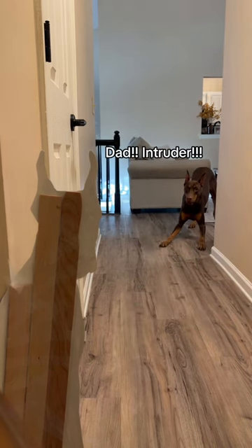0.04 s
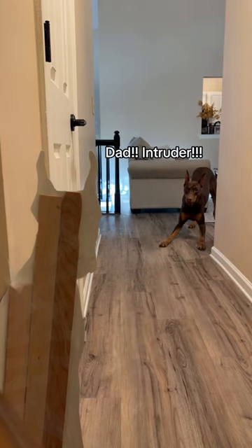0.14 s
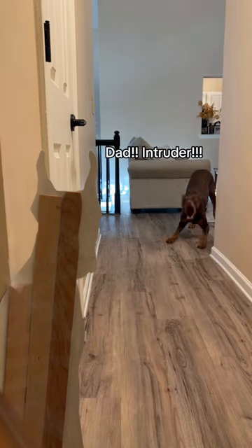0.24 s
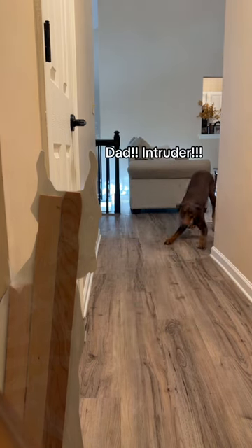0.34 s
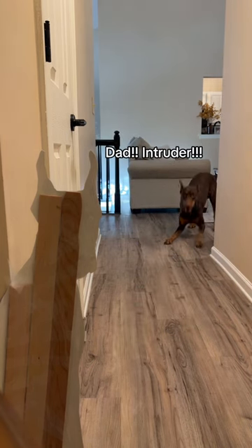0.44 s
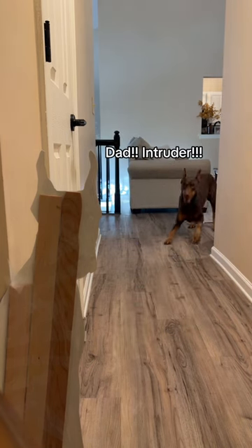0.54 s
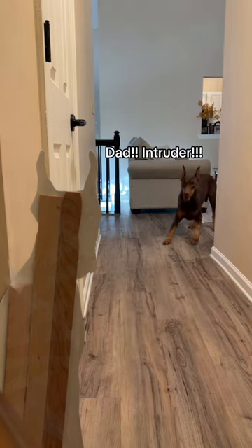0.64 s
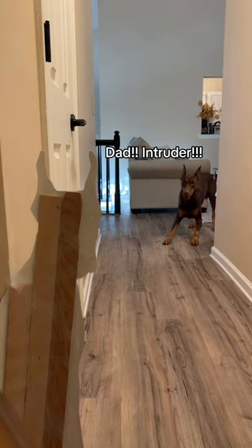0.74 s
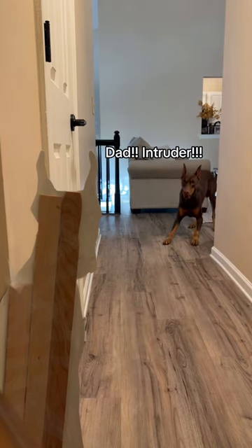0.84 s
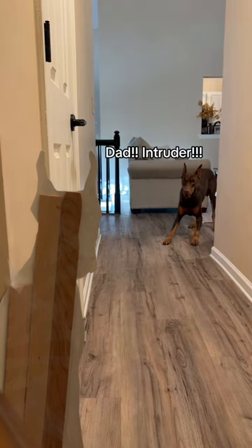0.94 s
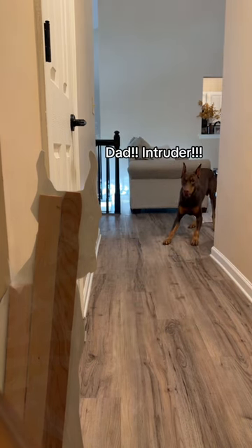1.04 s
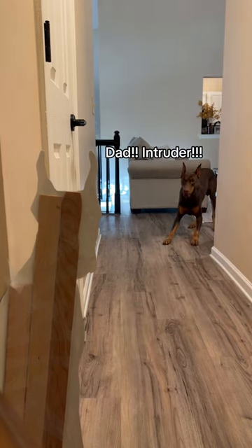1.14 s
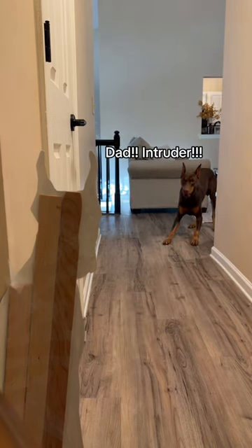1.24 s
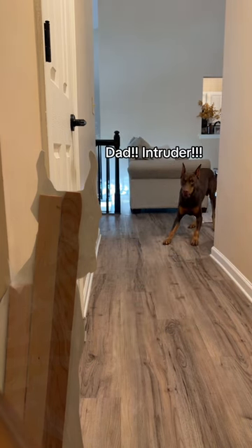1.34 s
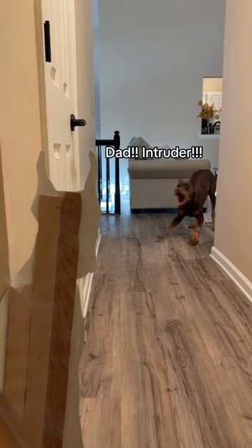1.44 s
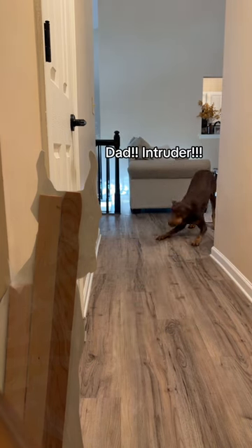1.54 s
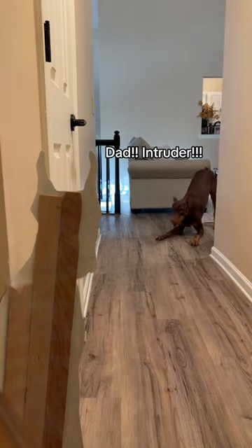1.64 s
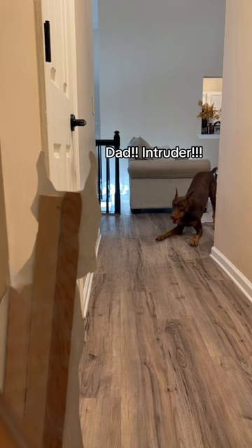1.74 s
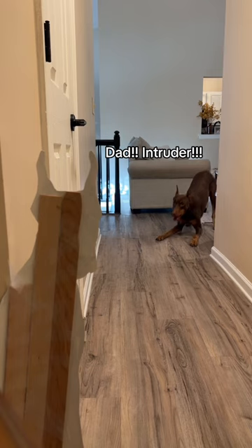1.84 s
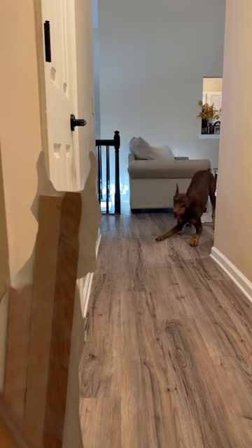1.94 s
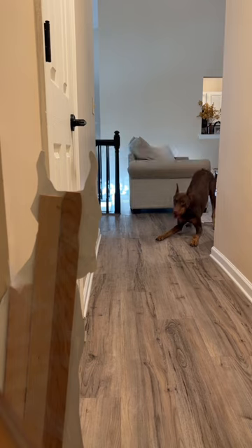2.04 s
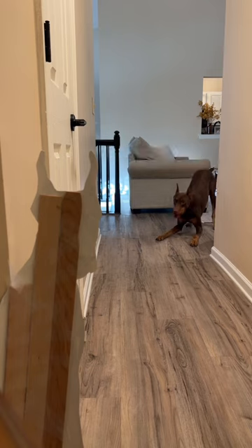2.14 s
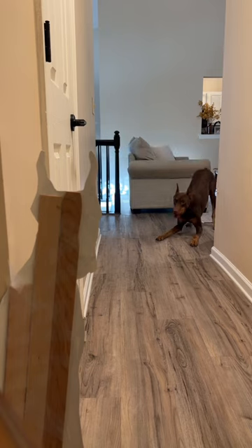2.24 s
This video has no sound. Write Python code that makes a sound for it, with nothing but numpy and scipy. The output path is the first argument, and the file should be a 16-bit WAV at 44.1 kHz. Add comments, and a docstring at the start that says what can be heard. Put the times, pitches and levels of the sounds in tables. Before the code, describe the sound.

A large dog barks twice, about a second apart, at the far end of a hallway with a wooden floor; paws thud and scuff between, the rooms ring, and a distant microphone picks up faint room noise.

```python
"""Steady coloured room noise, then a large dog barks twice at the far end of a hallway with a wooden floor.
Each bark starts as a hoarse, closed-mouth 'wu' and opens into a pitched 'ah': pulses and chopped air in a throat.
Paws thud (noise bursts), slide (noise swells) and boom in the floor (decaying sine) around and between the barks.
Modes and diffuse echoes make the hall and the living room behind it ring.
The recorder's gain control ducks at the first bark and recovers slowly, so the room noise sinks away."""
import sys
import numpy as np
from scipy import signal
from scipy.fft import rfft, irfft, next_fast_len
from scipy.io import wavfile
from scipy.ndimage import uniform_filter1d, map_coordinates

SR = 44100
rng = np.random.default_rng(int(sys.argv[2]) if len(sys.argv) > 2 else 0)


def wav_record(signal):
    """Record a signal, one row per channel, as 16-bit PCM in the file named by sys.argv[1]."""
    frames = np.transpose(np.atleast_2d(signal))
    bounded = np.clip(frames, -1, 1)
    # unit amplitude maps onto the largest positive 16-bit level
    quanta = np.round(bounded * 32767).astype(np.int16)
    wavfile.write(sys.argv[1], SR, quanta)


N = 101430


def amp(db):
    """Decibels to gain."""
    return 10 ** (np.asarray(db) / 20)


def unit(x):
    """Scale to rms 1."""
    return x / np.sqrt(np.mean(x ** 2) + 1e-20)


def along(points, hz):
    """Interpolate (Hz, value) points on a log frequency axis."""
    point_hz, value = np.transpose(points)
    return np.interp(np.log(hz + 1), np.log(point_hz + 1), value)


def wobble(knots_per_s):
    """Smooth random curve through normally distributed knots."""
    knots = rng.standard_normal(N // 8)
    return map_coordinates(knots, [np.arange(N) * knots_per_s / SR], mode='wrap')


def colour(x, points):
    """Minimum-phase filter with the given (Hz, dB) shape, made by folding the cepstrum."""
    m = 2 * next_fast_len(N)
    gain = amp(along(points, np.fft.rfftfreq(m, 1 / SR)))
    cepstrum = irfft(np.log(gain), m)
    cepstrum[1:m // 2] *= 2
    cepstrum[m // 2 + 1:] = 0
    response = np.exp(rfft(cepstrum))
    return irfft(rfft(x, m) * response, m)[:N]


def noise(points):
    """Coloured noise of rms 1."""
    return unit(colour(rng.standard_normal(N), points))


def power(x, seconds):
    """Running mean square over a centred window."""
    return np.abs(uniform_filter1d(x ** 2, max(2, int(seconds * SR)))) + 1e-12


def room_noise():
    """Steady noise with the uneven spectrum of the room."""
    level_db = -50.5
    # spectrum shape: freq_hz, relative_density_db
    air_shape = [(25, 11), (65, 9), (110, -7), (205, -.5), (290, -9.5), (420, -3), (560, -13), (690, 1.5),
                 (900, -7.5), (1300, -10), (2200, -14), (3800, -16.5), (5200, -24), (7500, -27.5),
                 (10000, -44.5), (15500, -46.5)]
    return amp(level_db) * noise(air_shape)


def bark(rows, closed_throat, open_throat):
    """Smeared vocal fold pulses and chopped air pass a throat that opens; hiss and a low push go with them."""
    jitter, rough_jitter = .009, .052  # relative pitch scatter: always, and added in full roughness
    shimmer_db, scatter_per_s = 2, 290  # size scatter of the pulses; knots of both scatters
    rasp_depth = 0.49  # how far each cycle chops the air
    smear_rad = .45  # phase lag per squared harmonic number
    chest_db, chest_open_db = -35, -2.5  # low push against the voice; change with the mouth open
    # air rushing past the teeth, shape: freq_hz, relative_db
    teeth_shape = [(1320, -32.5), (2250, -4.5), (2340, -10.5), (2540, -0.5), (2750, -5.5), (3030, 0.5),
                   (3160, -11.5), (3400, -4.5), (3960, -9.5), (4400, -1.5), (4770, -12), (5130, -6.5),
                   (6220, -6.5), (7140, -12), (7870, -12), (10300, -34), (15500, -39)]
    # the same with the jaws close together: freq_hz, relative_db
    snarl_shape = [(900, -22), (2000, -3), (2550, 0.5), (3200, -5.5), (4200, -2.5), (5200, 0.5), (6400, -7),
                   (8200, -13), (9500, -16), (10500, -34), (15500, -38.5)]
    # low push of the bark, shape: freq_hz, relative_db
    chest_shape = [(25, -26.5), (50, -12.5), (75, -3), (120, 5.5), (195, 8), (350, -20.5), (1000, -67.5)]

    s, *columns = np.transpose(rows)
    t = np.arange(N) / SR
    pitch_hz, level_db, rough, mouth, hiss_db = (np.interp(t, s, c) for c in columns)
    sounding = np.interp(t, [s[0] - .01, s[0], s[-1], s[-1] + .01], [0, 1, 1, 0])

    scatter = (jitter + rough_jitter * rough) * wobble(scatter_per_s)
    phase = 2 * np.pi * np.cumsum(pitch_hz * (1 + scatter)) / SR
    harmonics = sum(np.cos(k * phase - smear_rad * k * k) for k in range(1, 13))
    pulses = harmonics * 2 * np.sqrt(pitch_hz / SR)  # power density to match the white noise
    pulses *= amp(shimmer_db * wobble(scatter_per_s))
    chop = unit(1 + rasp_depth * np.cos(phase))
    rasp = chop * rng.standard_normal(N)
    folds = np.sqrt(1 - rough) * pulses + np.sqrt(rough) * rasp

    voice = (1 - mouth) * colour(folds, closed_throat) + mouth * colour(folds, open_throat)
    voice /= np.sqrt(power(voice, .02))  # level now follows level_db alone
    air = np.sqrt(mouth) * noise(teeth_shape) + np.sqrt(1 - mouth) * noise(snarl_shape)
    hiss = amp(hiss_db) * chop * air
    chest = amp(chest_db + chest_open_db * mouth) * noise(chest_shape)
    return sounding * amp(level_db) * (voice + hiss + chest)


def stroke(start_s, t60_s, attack_s):
    """Envelope with a soft rise and an exponential fall."""
    t = np.maximum(np.arange(N) / SR - start_s, 0)
    return (1 - np.exp(-t / attack_s)) * np.exp(-np.log(1000) * t / t60_s)


def paws():
    """Pads thud and slide on the boards; the forelegs drop in the lunge of each bark and boom in the floor."""
    floor_hz, floor_t60_s = 75.35, 0.24
    # thuds: start_s, level_db, t60_s
    thuds = [(.198, -27, 0.16), (.688, -34.5, .2), (1.03, -49, .15), (1.372, -42, 0.18)]
    # thud shape: freq_hz, relative_db
    thud_shape = [(30, -23), (70, -4.5), (165, 3), (330, -11.5), (600, -7.5), (1500, -29), (5000, -48)]
    # slides: centre_s, level_db, half_length_s (to 1/e)
    scuffs = [(0.473, -44.5, 0.061), (0.6, -45, 0.024), (0.695, -52.5, 0.021)]
    # slide shape: freq_hz, relative_db
    scuff_shape = [(500, -8.5), (1500, 2.5), (3500, 1), (6000, -2), (7800, -6), (10000, -26.5),
                   (15500, -34)]
    # foreleg drops: start_s, level_db
    landings = [(0.256, -31.5), (1.475, -17.5)]

    t = np.arange(N) / SR
    thud_env = sum(amp(db) * stroke(s, t60_s, attack_s=0.0028) for s, db, t60_s in thuds)
    slide_env = sum(amp(db) * np.exp(-((t - s) / half_s) ** 2) for s, db, half_s in scuffs)
    boom_env = sum(amp(db) * stroke(s, floor_t60_s, attack_s=.01) for s, db in landings)
    boom = np.sin(2 * np.pi * floor_hz * t) * boom_env
    return noise(thud_shape) * thud_env + noise(scuff_shape) * slide_env + boom


def resonance(x, hz, t60_s):
    """One damped mode, gain 1 at its centre."""
    width_hz = np.log(1000) / (np.pi * t60_s)
    return signal.lfilter(*signal.iirpeak(hz, hz / width_hz, fs=SR), x)


def echo(x, decay, delay_s):
    """Diffuse reflections as decaying noise; each frequency dies at its own speed."""
    hz, t, z = signal.stft(rng.standard_normal(SR), SR, nperseg=256)
    fall = np.exp(-np.log(1000) * t / along(decay, hz)[:, None])
    tail = signal.istft(z * fall, SR, nperseg=256)[1]
    tail /= np.linalg.norm(tail)
    return signal.fftconvolve(x, np.pad(tail, (int(delay_s * SR), 0)))[:N]


def house(x):
    """Direct sound, modes and scatter of the hallway, the longer ring of the living room and its late swell."""
    direct_db, hall_mode_t60_s = -2, .1
    room_db, room_delay_s = -12.5, 0.041
    far_wall_db, far_wall_delay_s = -26.5, .19  # a later, duller swell of the ring
    # standing waves between the hallway walls: freq_hz, level_db
    hall_modes = [(364, -5), (500, 0), (742, -9), (905, -2.5), (1197, -2), (1400, -8.5), (1630, -6),
                  (1740, -3), (1872, -7)]
    # scatter off the hallway walls, stronger in the treble: freq_hz, gain_db
    hall_send = [(1500, -7.5), (3000, -2.5)]
    # hallway decay: freq_hz, t60_s
    hall_decay = [(100, 0.04), (500, 0.14), (1500, 0.094), (8000, 0.069)]
    # sound passed on to the living room: freq_hz, gain_db
    room_send = [(100, -6.5), (290, 1.5), (380, -5.5), (500, -2.5), (750, 1), (1100, -1), (1500, -1),
                 (2200, 3), (4200, 1.5), (4450, 8.5), (4700, 1), (6000, 2), (12000, -2)]
    # living room decay: freq_hz, t60_s
    room_decay = [(80, 0.34), (300, 0.67), (700, 0.63), (1100, 0.68), (1470, 0.69), (2200, 0.57),
                  (7000, 0.5), (12000, 0.65)]
    # living room modes that ring on longest: freq_hz, level_db, t60_s
    room_modes = [(737, -12, 1.0), (1454, -14.5, 1.45)]

    hall = sum(amp(db) * resonance(x, hz, hall_mode_t60_s) for hz, db in hall_modes)
    hall += echo(colour(x, hall_send), hall_decay, delay_s=.001)
    sent = colour(x, room_send)
    ring = amp(room_db) * echo(sent, room_decay, room_delay_s)
    dulled = colour(sent, [(1600, -1.5), (3000, -12.5)])
    swell = amp(far_wall_db) * echo(dulled, hall_decay, far_wall_delay_s)
    lingering = sum(amp(db) * resonance(x, hz, t60_s) for hz, db, t60_s in room_modes)
    return amp(direct_db) * x + hall + ring + swell + lingering


def scene():
    """The dog in the house, over steady room noise."""
    # barks: time_s, pitch_hz, level_db, roughness (0-1), mouth_opening (0-1), hiss_db (against the voice)
    bark_1 = [(.16, 240.4, -59, 0.92, 0.4, -2.5), (.182, 262.3, -40, 0.66, 0.16, -15.5),
              (.204, 274.7, -10.5, 0.21, 0, -29), (.232, 312.2, -14.5, 0.7, 0.35, -28),
              (.25, 355.8, -8, 0.15, 0.64, -23), (.268, 366.5, 0.5, 0.25, .95, -21),
              (.29, 376, 0.5, .16, 0.61, -22.5), (.312, 376.2, -1.5, 0.07, 0.98, -24.5),
              (.337, 366.5, -4, 0.17, 0.88, -24), (.365, 290, -21, .5, 0.4, -14.5)]
    bark_2 = [(1.358, 238, -45.5, 0.74, 0.34, -28.5), (1.378, 259.7, -23.5, .6, 0.05, -22.5),
              (1.394, 277.8, -9, 0.27, 0.057, -28), (1.417, 298.1, 3, 0.65, 0.00018, -29),
              (1.44, 346.7, -2.5, .38, .36, -20), (1.458, 363.5, 3.5, .14, 0.96, -25),
              (1.484, 372.2, 1.5, .14, 0.91, -25), (1.508, 361.3, -4.5, 0.2, 0.96, -23),
              (1.528, 287.5, -12.5, 0.28, .43, -15.5), (1.56, 267.7, -27, 1, 0.97, -7)]
    # throat with the mouth nearly closed, one per bark: freq_hz, relative_db
    closed_1 = [(50, -47.5), (230, -30.5), (320, -11.5), (410, -1), (530, 2), (690, -13), (900, -9),
                (1150, -19.5), (1600, -18.5), (2150, -23.5), (2600, -47), (5000, -63.5)]
    closed_2 = [(100, -31), (255, -30), (330, -12.5), (410, -1), (500, 5), (650, -12.5), (880, 0),
                (1150, -25.5), (1380, -15), (1630, -15), (2050, -21.5), (2600, -49), (5000, -61)]
    # throat with the mouth wide open, one per bark: freq_hz, relative_db
    open_1 = [(120, -42), (240, -33.5), (300, -20), (380, -16), (510, -4), (620, -6), (750, -2.5),
              (900, -2.5), (1130, -2.5), (1350, -6), (1500, -4.5), (1670, -15.5), (1850, -17), (2000, -23),
              (2400, -31.5), (5000, -56.5)]
    open_2 = [(120, -48), (230, -28), (290, -11), (375, -17.5), (510, 1.5), (730, -3), (1110, -5),
              (1250, -8.5), (1450, 0.5), (1800, -22.5), (2300, -26), (5000, -51)]

    air = room_noise()
    first = house(bark(bark_1, closed_1, open_1))
    second = house(bark(bark_2, closed_2, open_2))
    return (air + first + second + house(paws()))[None]


def record(dry):
    """Gain control that ducks at once and recovers slowly, then the bass roll-off and the band limit."""
    limit_db, recover_db_per_s, detect_s = -16, 3, 0.012
    bass_cut_hz, top_hz = 55, 15750

    level_db = 10 * np.log10(power(dry[0], detect_s))
    excess_db = np.maximum(level_db - limit_db, 0)
    recovery_db = recover_db_per_s * np.arange(N) / SR
    duck_db = np.maximum.accumulate(excess_db + recovery_db) - recovery_db  # peak hold with a linear fall

    high_pass = signal.butter(2, bass_cut_hz, 'high', fs=SR, output='sos')
    ducked = signal.sosfilt(high_pass, dry * amp(-duck_db))
    m = next_fast_len(N + SR // 2)
    in_band = np.fft.rfftfreq(m, 1 / SR) < top_hz
    return irfft(rfft(ducked, m) * in_band, m)[:, :N]


dry = scene()
out = record(dry)
wav_record(out)
```